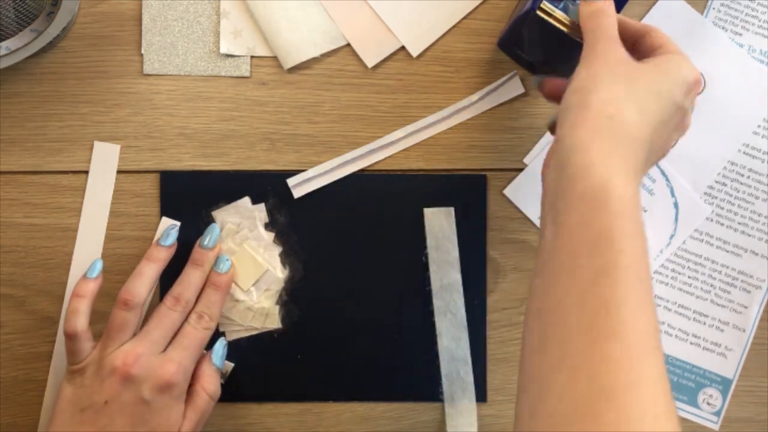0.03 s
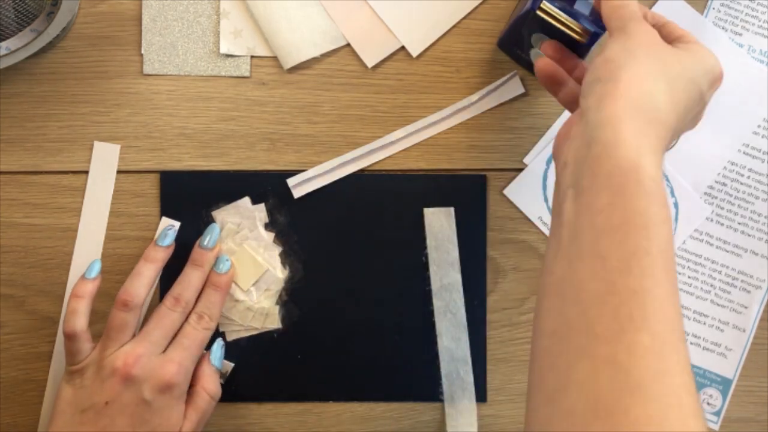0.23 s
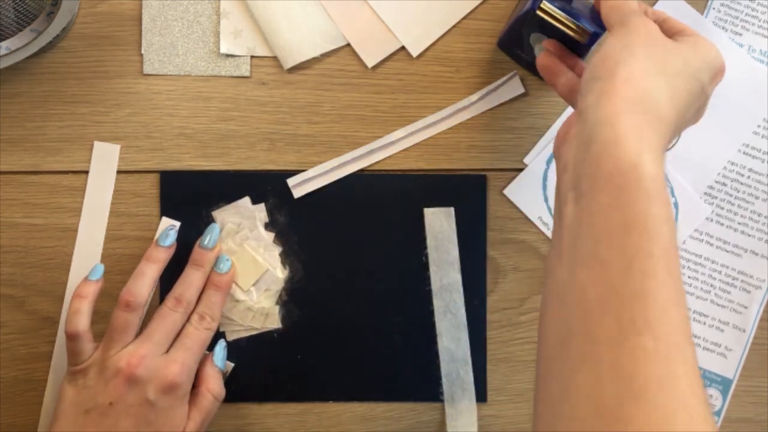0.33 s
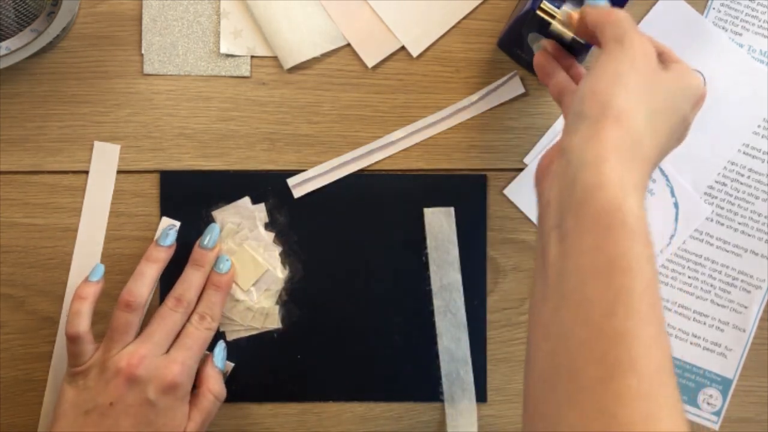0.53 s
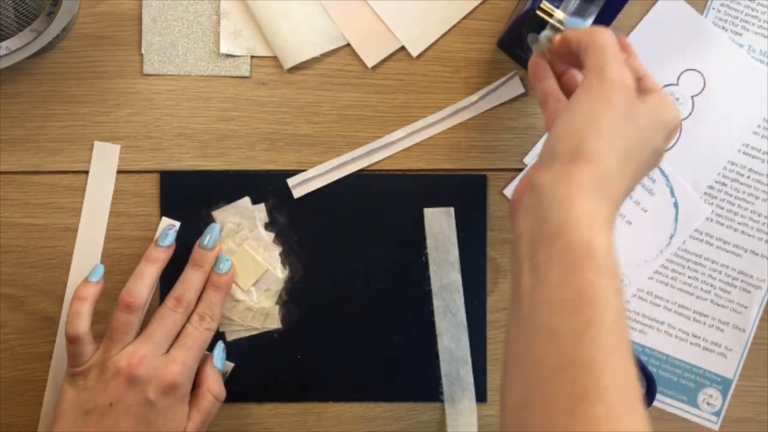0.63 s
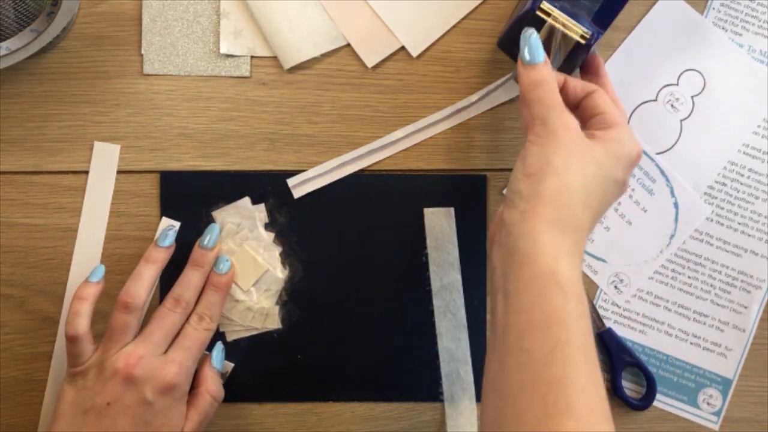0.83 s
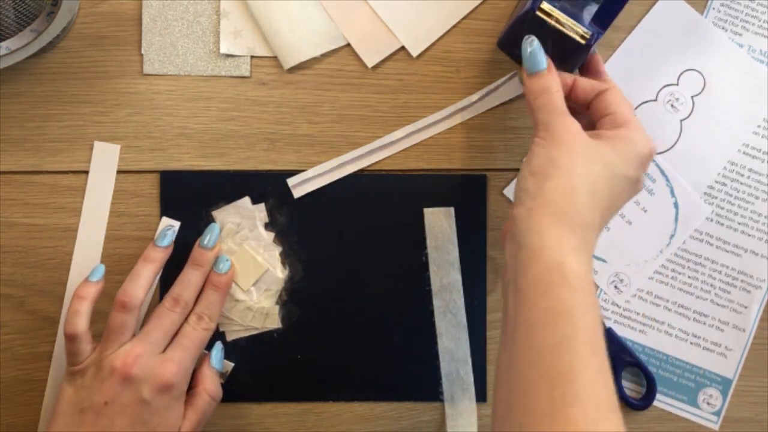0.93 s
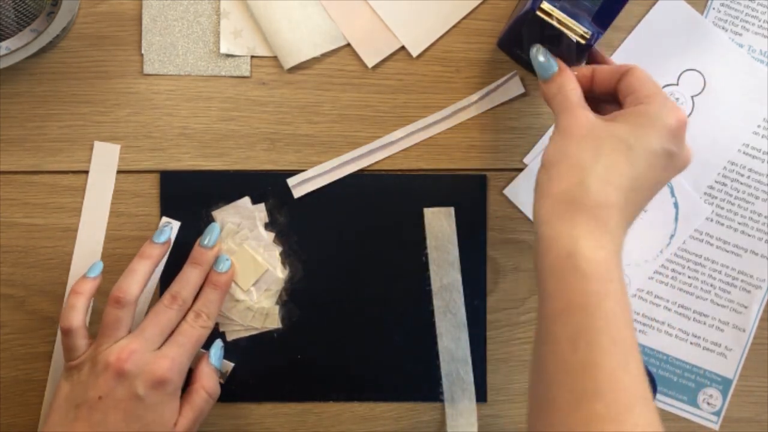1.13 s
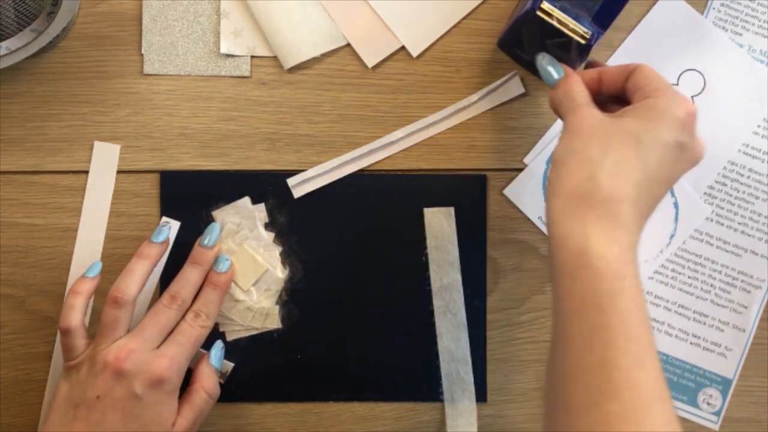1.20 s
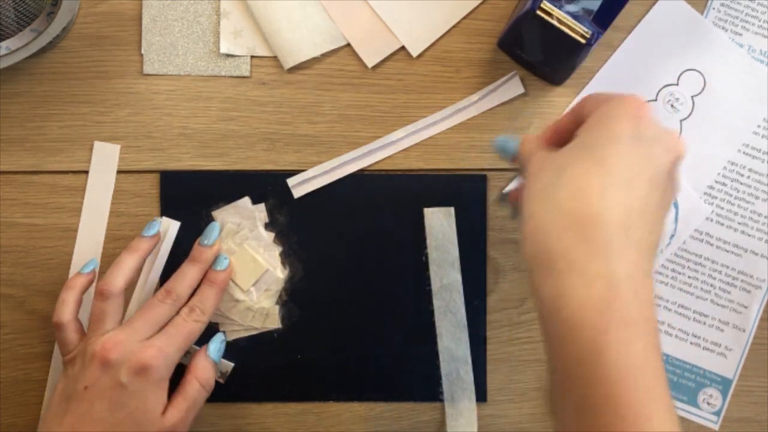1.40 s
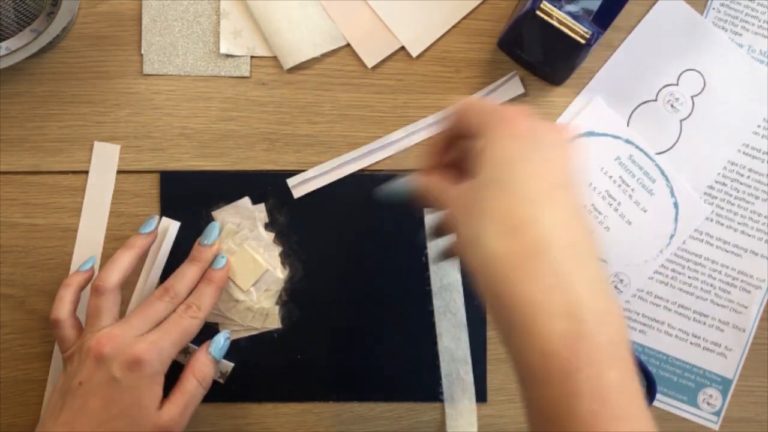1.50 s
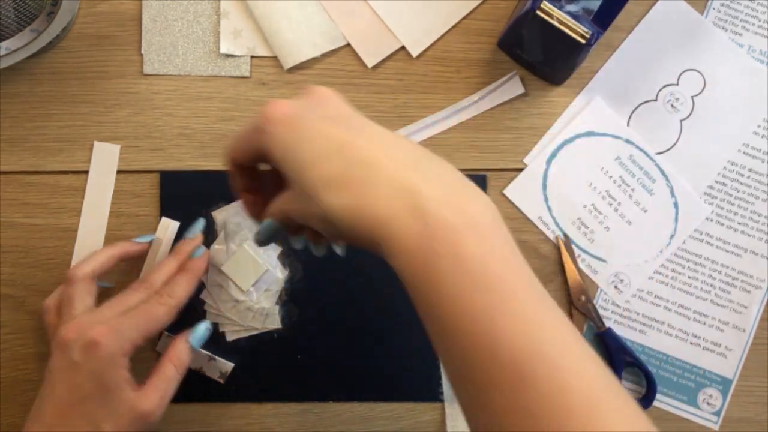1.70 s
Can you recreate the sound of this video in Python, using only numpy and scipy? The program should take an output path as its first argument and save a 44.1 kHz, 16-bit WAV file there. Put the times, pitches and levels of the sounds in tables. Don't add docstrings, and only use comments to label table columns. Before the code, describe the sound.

Sticky tape comes off a plastic desk dispenser in sharp, uneven cracks with small knocks, then tears in a fast bright rasp. After a brief pause the strip crackles and taps softly, close to the microphone in a quiet room.

```python
import sys
import numpy as np
from scipy import signal
from scipy.fft import rfft, irfft
from scipy.io import wavfile

SR = 44100
rng = np.random.default_rng(int(sys.argv[2]) if len(sys.argv) > 2 else 0)


def nominal_scale(level):
    x = np.asarray(level, float) / 20
    return 10 ** x


def materialize(psi):
    bounded = np.clip(np.atleast_2d(psi).T, -1, 1)
    quanta = np.round(bounded * 32767).astype(np.int16)
    wavfile.write(sys.argv[1], SR, quanta)


N = 77175


def at_hz(points, hz):
    table_hz, values = np.array(points).T
    return np.interp(np.log(hz), np.log(table_hz), values)


def band(x, low, high):
    sos = signal.butter(2, [low, min(high, 19000)], "band", fs=SR, output="sos")
    return signal.sosfilt(sos, x)


def train(s, gains):
    out = np.zeros(N)
    places = np.clip((np.asarray(s) * SR).astype(int), 0, N - 1)
    np.add.at(out, places, gains)
    return out


def ring(clicks, hz, t60):
    r = nominal_scale(-60 / (t60 * SR))
    w = 2 * np.pi * hz / SR
    return signal.lfilter([0, np.sin(w)], [1, -2 * r * np.cos(w), r * r], clicks + 1e-18)


# frequency in Hz, level in dB.
FLOOR = [(15, -34), (25, 1.5), (134, -9.5), (754, -21.5), (1040, -22), (1190, -31.5), (1480, -22.5),
         (2000, -35.5), (16000, -36.5)]


def room_tone():
    level_db = -63.5
    hz = np.maximum(np.arange(N // 2 + 1) * SR / N, 1)
    hush = irfft(rfft(rng.standard_normal(N)) * nominal_scale(at_hz(FLOOR, hz)), N)
    return nominal_scale(level_db) * hush / hush.std()


# frequency in Hz, time to fall 60 dB in seconds.
ROOM = [(300, 0.19), (1400, 0.19), (3700, 0.18), (7500, 0.17), (15000, 0.19)]
# frequency in Hz, level in dB.
ROOM_TONE = [(300, 9.5), (3000, 5), (8000, 0), (15000, -3)]


def room(x):
    level_db, start_s = -35.5, 0.0029
    t = np.arange(SR // 2) / SR
    white = rng.standard_normal((2, len(t)))
    edges = np.r_[40, 150, 300 * 2 ** np.arange(0, 6.1, .4)]
    tail = np.zeros(len(t))
    for k, (low, high) in enumerate(zip(edges, edges[1:])):
        centre = np.sqrt(low * high)
        fade_db = -60 * t / at_hz(ROOM, centre) + at_hz(ROOM_TONE, centre)
        tail += band(white[k % 2], low, high) * nominal_scale(fade_db)
    tail = tail * np.clip(t / start_s - 1, 0, 1)
    return nominal_scale(level_db) * signal.fftconvolve(x, tail)[:N]


# start in seconds, length in seconds, centre frequency in Hz, level in dB.
RUBS = [(.165, 0.025, 197, -54), (.27, 0.068, 80, -55.5), (.37, 0.097, 214, -62), (.41, 0.063, 79.3, -50.5),
        (1.04, 0.11, 148, -55), (1.2, 0.08, 170, -53.5), (1.25, 0.08, 128, -47.5),
        (1.25, 0.033, 319, -52.5), (1.33, 0.044, 118, -55), (1.37, 0.058, 201, -64),
        (.16, 0.019, 3300, -54), (.416, 0.011, 10700, -25), (1.565, 0.034, 5640, -61),
        (1.59, 0.018, 1470, -59.5), (1.63, 0.018, 1600, -57), (1.635, 0.035, 7040, -63.5),
        (1.73, 0.013, 4050, -64), (.87, 0.018, 1230, -61.5), (.215, .02, 8600, -41)]


def rubs():
    width = 1.295
    white, t, out = rng.standard_normal((2, N)), np.arange(N) / SR, np.zeros(N)
    for k, (s, length, hz, db) in enumerate(RUBS):
        swell = np.sin(np.pi * np.clip((t - s) / length, 0, 1)) * white[k % 2]
        rub = band(swell + 1e-18, hz / width, hz * width)
        out += nominal_scale(db) * np.sqrt(SR / hz) * rub
    return out


# start in seconds, frequency in Hz, level in dB, time to fall 60 dB in seconds.
KNOCKS = [(.065, 5000, -50, 0.015), (.119, 4850, -59, 0.038), (0.29, 1120, -33, 0.05),
          (0.4298, 1105, -25, 0.09), (0.429, 3520, -27, 0.06), (0.431, 2544, -36, 0.06),
          (0.431, 580, -45, 0.017), (.535, 764, -40.5, 0.042), (.877, 530, -56, 0.065),
          (1.018, 7800, -54, .02), (1.2535, 1375, -32, 0.16), (1.263, 3900, -36, 0.02),
          (1.309, 1310, -41, 0.056), (1.598, 602, -50.5, .05), (.406, 3400, -32, .02),
          (.376, 1150, -38, .02), (1.749, 5000, -51, 0.0055)]


def knocks():
    twin_ratio, twin_db = 1.03, -8
    white, t, out = rng.standard_normal(N), np.arange(N) / SR, np.zeros(N)
    for s, hz, db, t60 in KNOCKS:
        rattle = white * (t > s) * nominal_scale(-60 * np.maximum(t - s, 0) / t60)
        blow = train([s], 0.85) + 0.037 * rattle
        main = ring(blow, hz, t60 * .55)
        twin = ring(blow, hz * twin_ratio, t60 * .4)
        out += nominal_scale(db) * (main + nominal_scale(twin_db) * twin)
    return out


# frequency in Hz, level in dB, time to fall 60 dB in seconds.
BODY = [(83, -56, 0.099), (170, -55.5, .06), (270, -46.5, 0.045), (285, -60.5, 0.0087), (541, -41.5, 0.033),
        (854, -44, 0.024), (1136, -43.5, .03)]
# start in seconds, level of the top band in dB,
# then the levels near 7 kHz and 3 kHz in dB against the top.
RASP = [(0.5352, -0.1, -3.5, -9), (0.5467, -1, -6, -15), (0.5508, -3.3, -10, -14.5),
        (0.5547, -0.5, -7, -11.5), (0.5566, -15, -8, -12.5), (0.5631, 1, -10.5, -24),
        (0.5636, -11.5, -8, -6.5), (0.5716, 2, -10.5, -11.5), (0.5754, -1.3, -10, -7),
        (0.5876, 2, -11, -21.5), (0.5909, 0.7, -10, -11.5), (0.5983, 1, -4, -9), (0.6021, 0, -10, -13.5),
        (0.6089, 3, -5.5, -19), (0.6216, 5, -6, -12), (0.6246, -2, -4.5, -5.5), (0.6281, 2, -6.5, -13),
        (0.6326, 2.5, -4.5, -15), (0.641, 3.2, -14, -7), (0.6446, 2.3, -17, -9.5), (0.648, 0.2, -2.5, -5.5),
        (0.652, 0.5, -3.5, -7.7), (0.662, -2.2, -3.5, -6.5), (0.6632, 4.5, -2, -5.5), (0.679, 3.6, -5, -7),
        (0.6874, 2, -6, -3), (0.6939, 4, -8, -10), (0.6954, 1, -5, -6), (0.7028, -0.3, -6, -6),
        (0.7043, -14.5, 9.5, 4), (0.706, 3, -4.5, -7.5), (0.708, 0.2, -2, 1.5), (0.7082, -5, 2.5, -6),
        (0.715, 1.5, -1, -18), (0.7182, -1, -21.5, -2), (0.7227, 1, -2.5, -14), (0.7249, 4, -12, -8),
        (0.7317, -11.5, -4.7, -13.5), (0.7426, -1.4, -11.5, -12.5), (0.7434, 2.5, -1, -6),
        (0.7499, -15, -1, -13.5), (0.7518, -22, -12, -12)]


def dispenser():
    s, db, *_ = np.transpose(RASP)
    strength = rng.standard_normal((len(s), len(BODY)))
    out = np.zeros(N)
    for k, (hz, level_db, t60) in enumerate(BODY):
        blows = train(s, nominal_scale(db + level_db) * strength[:, k])
        out += ring(blows, hz, min(t60, 20 / hz))
    return out


# start in seconds, level of the top band in dB,
# then the levels near 7 kHz, 3 kHz and 1 kHz in dB against the top.
PULLS = [(0.0653, -43.5, 1, -2.7, -9), (0.1188, -35, -6, -6.7, -10), (0.1201, -49, 0, -2.6, 0),
         (0.1223, -59, 4, 3.4, 15), (0.1262, -51, -0.6, 1.9, -3.0), (0.164, -52, -2.4, -0.4, 11),
         (0.1677, -42.5, 13.5, 5, 15), (0.1699, -44, 4, 6, 20.5), (0.2011, -50, -12, -13.5, 0),
         (0.2129, -8, -1.2, -17.4, -27), (0.2199, -30, -2, -19, -18.6), (0.2217, -30.5, -9, 2, -10),
         (0.2316, -13.5, -4, 0.2, -4.6), (0.2336, -23, 15.5, 0.5, 7.9), (0.2414, -8, 3.5, 7.5, -23.4),
         (0.2444, -13.5, -5, -2.0, -9.3), (0.2497, -12.5, -11.5, -0.5, -2), (0.2516, -15, 3.5, -9, -6.5),
         (0.2535, -17.5, 1.5, 0, 1), (0.2893, 3, -9.5, -17, -11), (0.2912, -15.5, -12.5, 4, -14),
         (0.3751, 4, -4.5, -10.5, -16.5), (0.3764, -1, -9.5, -19.5, -18), (0.4056, 5, -6, -14, -19.5),
         (0.4186, -12.5, -2.7, -5, -1), (0.4285, 3, 0.3, -11.5, -17.5), (0.4305, -9.5, -6.5, -7, -11.5),
         (0.4351, -12, -5.5, -1.5, -14.7)]
# start in seconds, level of the top band in dB,
# then the levels near 7 kHz, 3 kHz and 1 kHz in dB against the top.
HANDLING = [(0.9137, -63, 16, 28, 25), (0.9186, -59, 10, 20, 15.9), (0.9239, -23, -1.5, -2.5, -11),
            (0.9304, -38, -5, -22.7, 0), (0.9413, -49.5, 15, -4, 5.7), (1.0109, -43, -11, -14, 0.5),
            (1.0123, -43.4, -10, -15, -3.4), (1.0184, -52, 3, 2, 1), (1.0449, -10.5, -0.3, -1.5, 1.6),
            (1.0682, -29, 3, -9, -18), (1.0725, -16.5, 3, 5, -5), (1.0743, -30.5, 4, 18.5, 23.5),
            (1.0757, -17, 7, -10, 0), (1.0826, -20, -0.5, 0, -17), (1.0899, -14.5, 1, -0.5, -9),
            (1.0945, -34, -7, 2, -10.4), (1.127, -27, -12, -23, -18), (1.1914, -16, 8, 0, -18),
            (1.2049, -13.5, -15, -23, -4), (1.2138, -22, 1.2, 6, -3.5), (1.2489, -15, 0, 5.0, -2),
            (1.2501, -3.5, -4.2, -5.5, -18), (1.2539, -19, 2, 14, 15.5), (1.2637, -4, -10, 1.7, 0.5),
            (1.2667, -29, 4, -6, -4), (1.3072, -21, 2, 1, 2), (1.3494, -54.5, 21, -3, 4),
            (1.374, -7, 2, -2.5, -12), (1.3758, -17.5, -18, -7.5, -3.5), (1.522, -46, -4.8, -2, 1),
            (1.5363, -48, 1, 4, 7), (1.5682, -44.3, -27.6, -17, -14.9), (1.5746, -23.5, -2.5, -7.5, -7.2),
            (1.5985, -38, -4.2, 10.5, 14), (1.6435, -44, 5.9, 12.5, 12.3), (1.6557, -44, 0, -7, 6),
            (1.6636, -40, 9, -9, -6), (1.6731, -37, -3, 8, -5), (1.7348, -63.5, 4, 24, 25),
            (1.7481, -64, 12, 20, 8.0)]


def all_slips():
    low_db = -4.5
    rasp = [(s, db, dull, middle, middle + low_db) for s, db, dull, middle in RASP]
    return np.transpose(list(PULLS) + rasp + list(HANDLING))


# frequency in Hz, level in dB per Hz.
CRACK = [(350, -20.5), (1100, -1.5), (10000, 4), (16000, -3)]
# frequency in Hz, level in dB over the noise burst.
SPIKE = [(1500, 13), (4000, 15), (7000, 15), (10000, 9), (14500, 23)]


def cracks():
    crack_db, t60_s, rise_s = -15, 0.015, 0.0002
    echo_s, echo_db = .001, -10
    low_lag_s = .00012
    to_room_db = 19
    s, db, *bands_db = all_slips()
    t = np.arange(SR // 20) / SR
    hz = np.maximum(np.arange(N // 2 + 1) * SR / N, 1)
    shape = nominal_scale(-60 * t / t60_s) * (1 - np.exp(-t / rise_s))
    white = rng.standard_normal(N)
    colour = nominal_scale(crack_db + at_hz(CRACK, hz))
    place = at_hz([(1500, 3), (3700, 2), (7000, 1), (12000, 0)], hz)
    pulse, burst = 0, 0
    for j, band_db in enumerate([0, *bands_db]):
        share = np.cos(np.pi / 2 * np.clip(place - j, -1, 1)) ** 2 * colour
        clicks = train(s, nominal_scale(db + band_db))
        pulse = pulse + share * rfft(np.roll(clicks, 12))
        noise = signal.fftconvolve(clicks, shape)[:N] * white
        burst = burst + share * rfft(noise)
    lag = np.exp(-2j * np.pi * hz * low_lag_s * place)
    bounce = 1 + nominal_scale(echo_db) * np.exp(-2j * np.pi * hz * echo_s)
    spike = pulse * nominal_scale(at_hz(SPIKE, hz)) * lag * bounce
    return irfft(spike + burst, N), nominal_scale(to_room_db) * irfft(pulse, N)


def scene():
    knock_room_db = -9
    tape, pulses = cracks()
    near = dispenser() + rubs()
    rings = knocks()
    reflections = room(pulses + near + nominal_scale(knock_room_db) * rings)
    return (tape + near + rings + reflections + room_tone())[None]


def low_pass(x):
    return signal.sosfilt(signal.butter(12, 17150, fs=SR, output="sos"), x)


def record(dry):
    low_hz, cutoff_hz = 60, 16300
    bass_cut = signal.butter(2, low_hz, "high", fs=SR, output="sos")
    top_cut = signal.cheby2(12, 60, cutoff_hz * 1.024, fs=SR, output="sos")
    mix = signal.sosfilt(top_cut, signal.sosfilt(bass_cut, dry))
    return low_pass(mix)


dry = scene()
out = record(dry)
materialize(out)
```